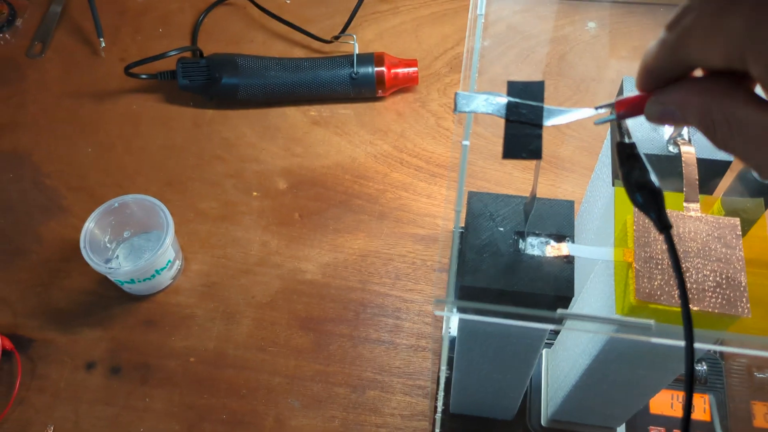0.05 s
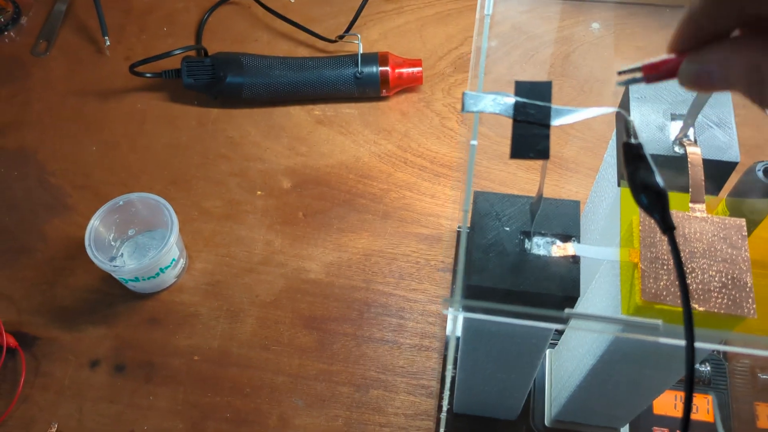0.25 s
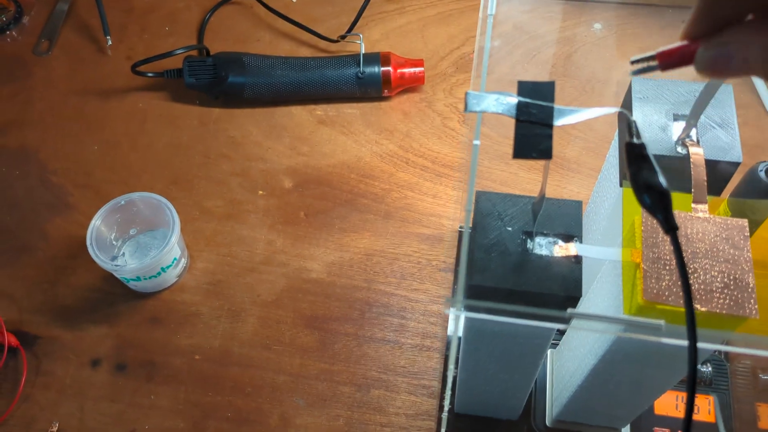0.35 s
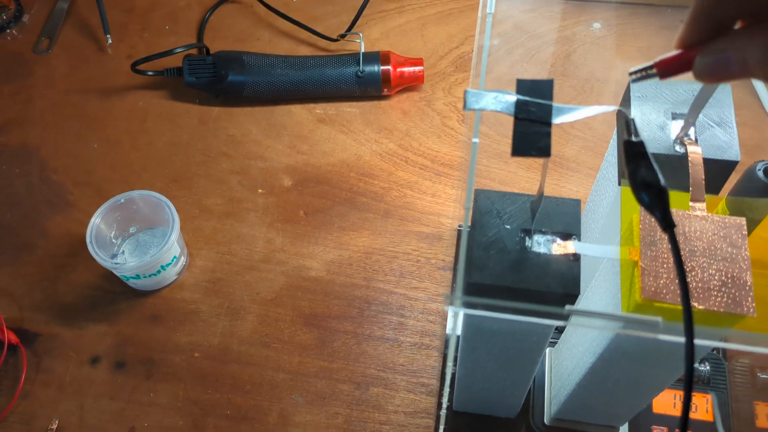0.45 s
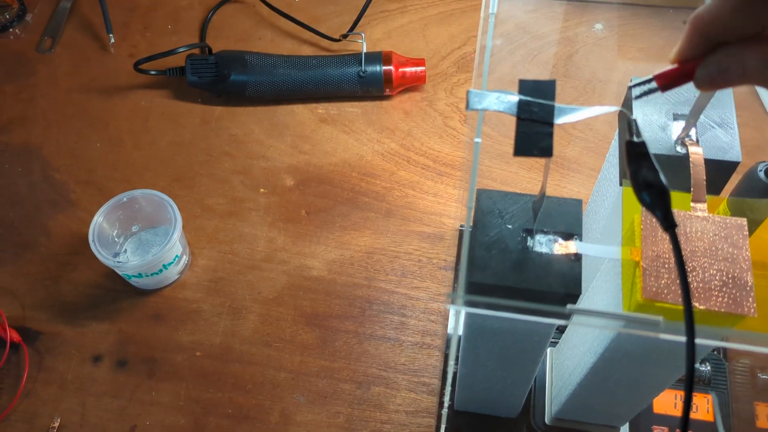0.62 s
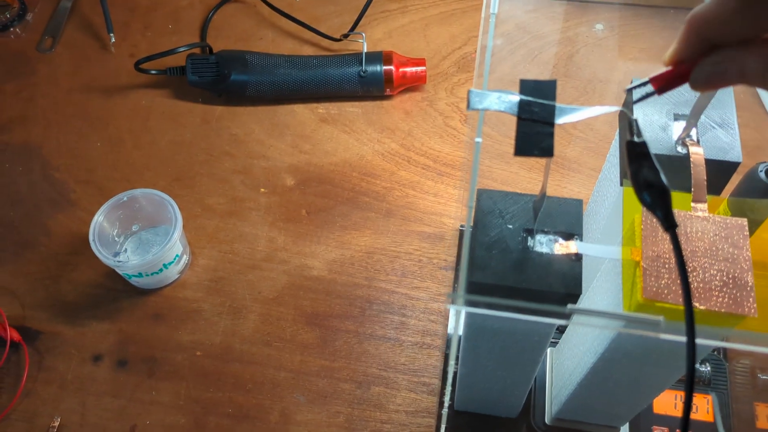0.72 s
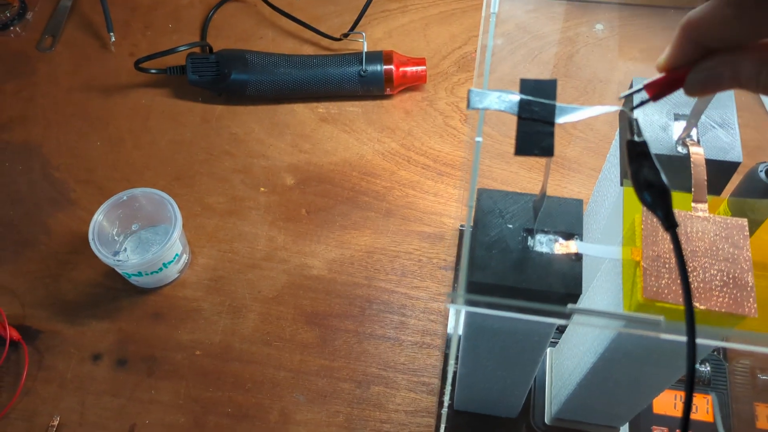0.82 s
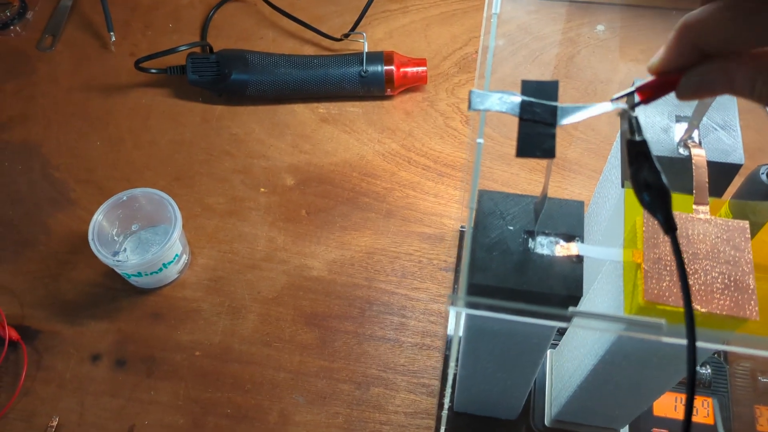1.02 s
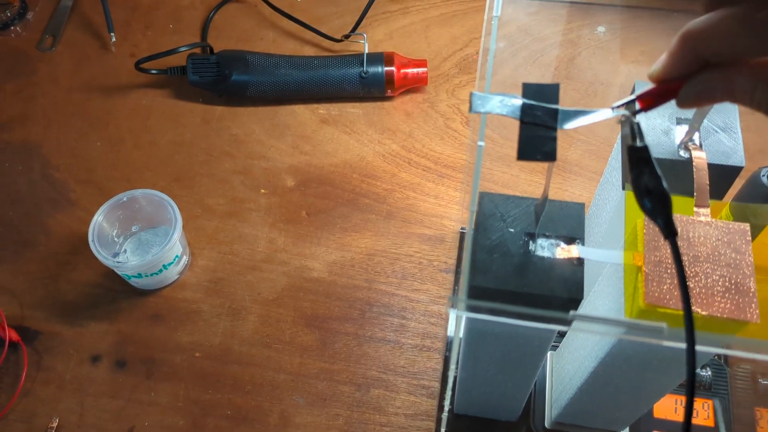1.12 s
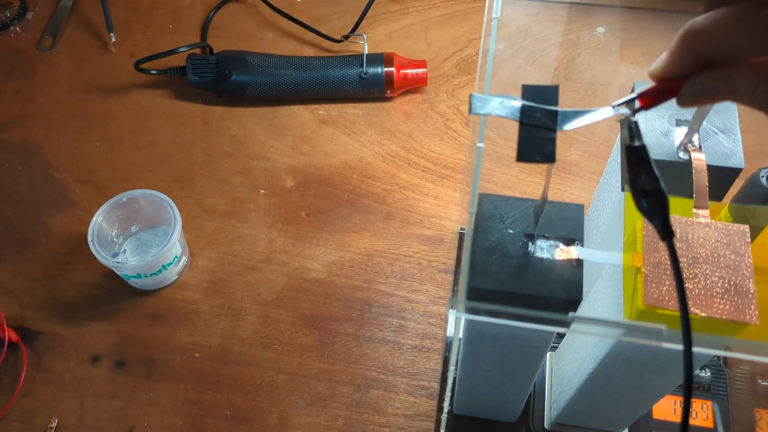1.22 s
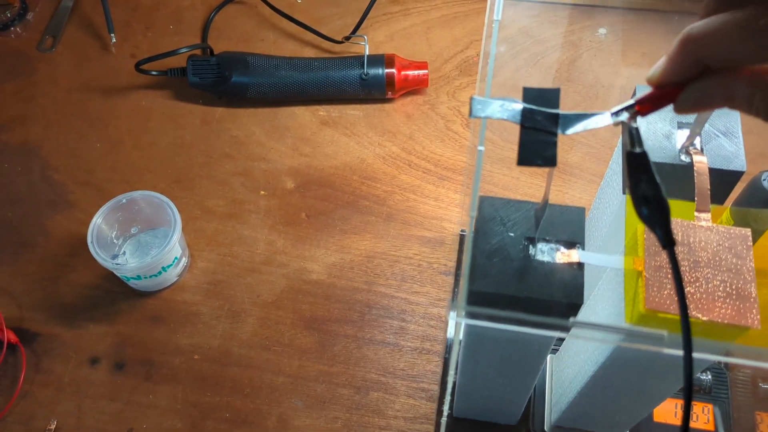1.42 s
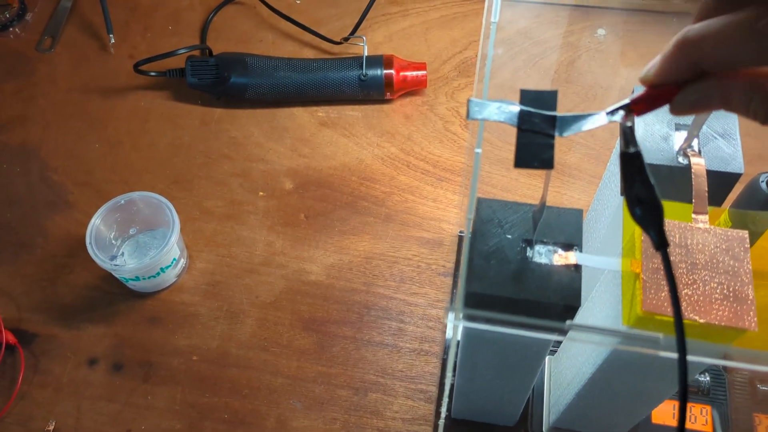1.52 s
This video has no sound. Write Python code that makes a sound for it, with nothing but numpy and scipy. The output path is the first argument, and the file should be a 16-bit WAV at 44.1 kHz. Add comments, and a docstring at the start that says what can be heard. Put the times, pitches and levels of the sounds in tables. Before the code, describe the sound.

A crocodile clip is handled against a metal strip, starting with a tiny squeak at 0.1 seconds. From 0.2 seconds come light scrapes and dull bumps of a plastic apparatus on a wooden table. At about 0.6 seconds the jaws snap shut in one sharp tap. Softer nudges follow until 1.3 seconds while a very faint whine sinks in pitch. Low rumble and hiss fill the small room throughout.

```python
"""Over a low rumble and a hiss, a crocodile clip is squeezed with a tiny squeak and fumbled against a
metal strip on a plastic apparatus that stands on a wooden table. The hand bumps the apparatus, whose
damped modes boom dully, and the jaws scrape by friction. At about 0.6 s they snap shut in one sharp
tap. Softer nudges follow while a faint whine sinks in pitch. A small room reverberates throughout."""
import sys
import numpy as np
from scipy import signal
from scipy.fft import rfft, irfft, next_fast_len
from scipy.io import wavfile
from scipy.ndimage import map_coordinates

SR = 44100
rng = np.random.default_rng(int(sys.argv[2]) if len(sys.argv) > 2 else 0)


def materialize(psi):
    """Save the field psi as 16-bit PCM at rate SR to the path in sys.argv[1].

    A 1-D psi becomes a single channel; in a 2-D psi each row is a channel.
    """
    bounded = np.clip(np.atleast_2d(psi).T, -1, 1)
    quanta = np.round(bounded * 32767).astype(np.int16)
    wavfile.write(sys.argv[1], SR, quanta)


N = 68355


def amp(db):
    """Amplitude ratio of a level in decibels."""
    return 10 ** (np.asarray(db) / 20)


def unit(x):
    """Normalisation to an rms of 1."""
    return x / np.sqrt(np.mean(x ** 2) + 1e-20)


def along(points, hz):
    """Interpolation of (frequency, value) points on a logarithmic frequency axis."""
    freqs, values = np.transpose(points)
    return np.interp(np.log(hz + 1), np.log(freqs + 1), values)


def curves(rows):
    """Linear interpolation in time: one value per sample for each column after the first."""
    times, *columns = np.transpose(rows)
    return [np.interp(np.arange(N) / SR, times, column) for column in columns]


def since(start):
    """Seconds elapsed since start, zero before it."""
    return np.maximum(np.arange(N) / SR - start, 0)


def wobble(knots_per_s):
    """Smooth random modulation: a spline through Gaussian values."""
    return map_coordinates(rng.standard_normal(N // 20), [np.arange(N) * knots_per_s / SR])


def filtered(x, response):
    """Linear filtering: the spectrum is multiplied by a frequency response."""
    size = next_fast_len(N + SR // 2)
    return irfft(rfft(x, size) * response(np.fft.rfftfreq(size, 1 / SR)), size)[:N]


def highpass(x, hz, order):
    """A Butterworth filter attenuates the bass below hz."""
    return signal.sosfilt(signal.butter(order, hz, "highpass", fs=SR, output="sos"), x)


def coloured(x, colour):
    """Spectral shaping by (Hz, dB) points, scaled to an rms of 1."""
    return unit(filtered(x, lambda hz: amp(along(colour, hz))))


def noise(colour):
    """White noise shaped into coloured noise of rms 1."""
    return coloured(rng.standard_normal(N), colour)


def background():
    """Amplitude-modulated noise: rumble and hiss swell and ebb over steady microphone noise."""
    # Each row: frequency in Hz, relative level in dB.
    rumble_colour = [(25, -29), (38, -39.5), (54, 6), (70, 2), (90, 0.5), (115, 0), (170, -19), (280, -19),
                     (380, -29), (480, -18), (650, -39.5), (1500, -54)]
    hiss_colour = [(200, 23), (600, 5.5), (1100, 7.5), (1800, 7), (3000, 4), (4200, 0), (7000, 0),
                   (10000, -7), (12000, -16), (15500, -25)]
    # Each row: time in seconds, level in dB.
    rumble_levels = [(0, -49), (.15, -48.5), (.3, -44), (.7, -46.5), (.9, -48), (1.13, -45.5),
                     (1.23, -51.5), (1.55, -47)]
    hiss_levels = [(0, -64), (.15, -65), (.26, -59), (.33, -57), (.37, -64.5), (.42, -60.5), (.66, -54.5),
                   (.76, -67.5), (.83, -64), (.89, -59), (.96, -60.5), (1.05, -66.5), (1.11, -64),
                   (1.15, -62.5), (1.22, -69.5), (1.29, -65.5), (1.35, -61), (1.42, -70), (1.55, -64.5)]
    rumble = amp(curves(rumble_levels)[0]) * noise(rumble_colour)
    hiss = amp(curves(hiss_levels)[0]) * noise(hiss_colour)
    return rumble + hiss + amp(-82.5) * rng.standard_normal(N)


def whine():
    """A faint sinking tone, made unsteady by random frequency and amplitude modulation."""
    # Each row: time in seconds, frequency in Hz, level in dB.
    glide = [(.68, 1800, -77), (.8, 1722, -79), (.92, 1713, -69.5), (1.06, 1680, -76), (1.2, 1545, -78),
             (1.28, 1500, -86.5), (1.345, 1483, -66.5), (1.41, 1480, -78), (1.55, 1470, -79.5)]
    hz, db = curves(glide)
    wander_hz, flutter_db = 24.7 * wobble(200), 1.5 * wobble(59)
    phase = 2 * np.pi * np.cumsum(hz + wander_hz) / SR
    sounding = since(glide[0][0]) > 0
    return sounding * amp(db + flutter_db) * unit(np.sin(phase))


def room(x):
    """Reverberation: convolution with a noise tail in which each frequency decays at its own rate."""
    # Each row: frequency in Hz, time to fall 60 dB in seconds.
    decay_times = [(150, 0.27), (1000, 0.24), (3000, 0.29), (8000, 0.15), (15000, 0.26)]
    # Each row: frequency in Hz, gain in dB.
    tail_colour = [(100, -0.5), (230, -12.5), (500, -3.5), (1500, -12.5), (3000, -12.5), (8000, -4.5),
                   (15000, -15)]
    gap_s = 0.007
    hz, t, spectra = signal.stft(rng.standard_normal(SR // 2), SR, nperseg=256)
    spectra = spectra * amp(-60 * t / along(decay_times, hz)[:, None])
    plain = signal.istft(spectra, SR, nperseg=256)[1]
    spectra = spectra * amp(along(tail_colour, hz))[:, None]
    tail = signal.istft(spectra, SR, nperseg=256)[1] / np.linalg.norm(plain)
    return signal.fftconvolve(x, np.pad(tail, (int(gap_s * SR), 0)))[:N]


def squeak():
    """The squeezed clip squeaks: a Gaussian tone pulse, then a decaying ring of narrow-band noise."""
    centre_s, width_s, hz, ring_t60_s = 0.1142, 0.00036, 2760, 0.049
    t = np.arange(N) / SR - centre_s
    pip = np.exp(-0.5 * (t / width_s) ** 2) * np.sin(2 * np.pi * hz * t)
    decay = (t > 0) * amp(-10 - 60 * since(centre_s) / ring_t60_s)
    ring = decay * noise([(1900, -50), (hz, 0), (3900, -50)])
    return amp(-45) * (pip + ring)


def scrapes():
    """Sliding friction of the teeth on the strip: tiny catches over smooth noise, with a fizz on top."""
    # Each row: start in seconds, length in seconds, rasp level in dB, fizz level in dB.
    slides = [(0.172, 0.029, -58, -76), (0.215, 0.022, -55, -71), (.241, 0.015, -53, -83),
              (0.39, 0.039, -52.5, -105), (0.438, 0.057, -61, -79), (0.483, 0.028, -52.5, -85),
              (0.503, 0.027, -52, -89), (0.859, 0.078, -62.5, -78), (1.063, 0.086, -66.5, -74.5)]
    # Each row: frequency in Hz, relative level in dB.
    rasp_colour = [(200, -18), (600, 1), (1200, 0), (1600, 0.5), (2050, -0.5), (2600, -5.5), (4500, -18.5),
                   (9000, -27), (15000, -44)]
    fizz_colour = [(1500, -3), (4000, -6), (7000, 8.5), (11000, -4), (14000, -3), (16000, -2)]
    catches_per_s, catch_share = 1900, 0.34
    rasp_gain, fizz_gain = np.zeros((2, N))
    for start, length, rasp_db, fizz_db in slides:
        progress = np.minimum(since(start) / length, 1)
        arch = np.sqrt(np.abs(np.sin(np.pi * progress)))
        rasp_gain += amp(rasp_db) * arch
        fizz_gain += amp(fizz_db) * arch
    catches = unit((rng.random(N) < catches_per_s / SR) * rng.standard_normal(N))
    friction = np.sqrt(catch_share) * catches + np.sqrt(1 - catch_share) * rng.standard_normal(N)
    return rasp_gain * coloured(friction, rasp_colour) + fizz_gain * coloured(friction, fizz_colour)


def bumps():
    """Modal vibration of apparatus and table: each dull boom dies away quickly, its tail cut short."""
    # Each row: frequency in Hz, relative level in dB, time to fall 60 dB in seconds.
    body_modes = [(88, -11.5, 0.33), (125.7, 0, 0.17), (165.8, -3.5, 0.05), (230.4, 2.5, 0.17),
                  (281.4, 3, 0.06), (337, 1.5, 0.044), (394, -2, 0.042), (481, -15.5, 0.076),
                  (644.4, -4, 0.045), (814, -7.5, 0.064), (1029, -0.5, 0.049), (1137, 0.5, 0.073),
                  (1502, -10, 0.1), (1890, -17.5, 0.16)]
    # Each row: start in seconds, then the levels of thud, boom, knock and clink in dB.
    contacts = [(0.038, -46, -57.5, -55.5, -72.5), (.208, -38, -48, -46, -69),
                (.233, -38.5, -33.5, -34, -51.5), (.247, -29.5, -28, -32.5, -47.5),
                (0.271, -44, -33, -59, -78), (.302, -55, -38, -53, -76), (.393, -50, -36.5, -40, -46),
                (.411, -61, -31.5, -74, -41), (0.4341, -39, -34.5, -84, -52.5),
                (.501, -51, -37, -39.5, -40.5), (0.5178, -54, -29, -28.5, -40.5), (.54, -61, -34, -61, -57),
                (.586, -29, -37.5, -34.5, -37.5), (0.5978, -53, -32, -38, -38.5),
                (0.6129, -77, -38.5, -33.5, -51.5), (0.63, -47, -34.5, -47, -58),
                (0.85, -50, -37, -50, -59), (0.871, -41.5, -44.5, -58, -81), (.902, -47, -53, -35.5, -67),
                (.917, -42, -53, -34.5, -78), (1.081, -38, -49.5, -53.5, -66),
                (1.111, -37, -50, -49.5, -77), (1.142, -46, -58, -58, -71), (1.32, -45.5, -47.5, -57, -83),
                (1.339, -61, -56, -55, -70)]
    level_hz = (121, 231, 340, 1100)  # where those four levels apply
    rise_s, cutoff_s, in_phase_below_hz = 0.0012, 0.11, 260
    out = np.zeros(N)
    for start, *levels in contacts:
        first = int(start * SR)
        t = since(start)[first:first + SR // 2]
        colour = list(zip(level_hz, levels))
        gate = (1 - np.exp(-t / rise_s)) * np.exp(-(t / cutoff_s) ** 4)
        for (hz, db, t60), random_turn in zip(body_modes, rng.random(len(body_modes))):
            # Low modes stay in phase from bump to bump, so they build up.
            turns = hz * t + (hz * start if hz < in_phase_below_hz else random_turn)
            envelope = gate * amp(db + along(colour, hz) - 60 * t / t60)
            out[first:first + len(t)] += envelope * np.sin(2 * np.pi * turns)
    return out


def tap(start, ring_db, crack_db):
    """Impact of the jaws on metal: heavily damped modes and a bright broadband crack."""
    # Each row: frequency in Hz, relative level in dB, time to fall 60 dB in seconds.
    jaw_modes = [(1370, -3.5, 0.0078), (1969, -2.5, 0.01), (6100, -18.5, 0.0025), (10550, -22.5, 0.0037)]
    # Each row: frequency in Hz, relative level in dB.
    crack_colour = [(500, -12), (2000, 3.5), (3500, -2.5), (5500, 0), (8500, 0.5), (11000, -5.5),
                    (12500, -7.5), (15500, -4.5)]
    rattle_t60_s, snap_t60_s = 0.073, 0.0063
    t = since(start)
    ring = sum((-1) ** k * amp(db - 60 * t / t60) * np.sin(2 * np.pi * hz * t)
               for k, (hz, db, t60) in enumerate(jaw_modes))
    teeth_rattle = amp(-60 * t / rattle_t60_s)
    snap = amp(-2 - 60 * t / snap_t60_s)
    crack = (t > 0) * (teeth_rattle + snap) * noise(crack_colour)
    return amp(crack_db) * crack + amp(ring_db) * ring


def jaws():
    """Impulsive excitation of the jaws: one hard snap shut among light touches."""
    # Each row: start in seconds, ring level in dB, crack level in dB.
    touches = [(.1785, -44, -71), (.229, -46, -64), (.2415, -40.5, -74), (.3905, -47, -78),
               (.503, -35.5, -75), (.5945, -32, -58), (.8505, -44.5, -83)]
    return tap(start=0.5839, ring_db=-17, crack_db=-43) + sum(tap(*touch) for touch in touches)


def scene():
    """Superposition of the direct sound, its reverberation, the whine and the background."""
    handling = bumps() + scrapes() + jaws() + squeak()
    reverberation = room(highpass(handling, hz=300, order=2))
    return (handling + reverberation + whine() + background())[None]


def record(dry):
    """Band limiting: the deep bass is attenuated and the highest treble cut off."""
    top_hz = 15900
    thinned = highpass(dry[0], hz=47, order=8)
    return filtered(thinned, lambda hz: hz < top_hz)[None]


dry = scene()
out = record(dry)
materialize(out)
```